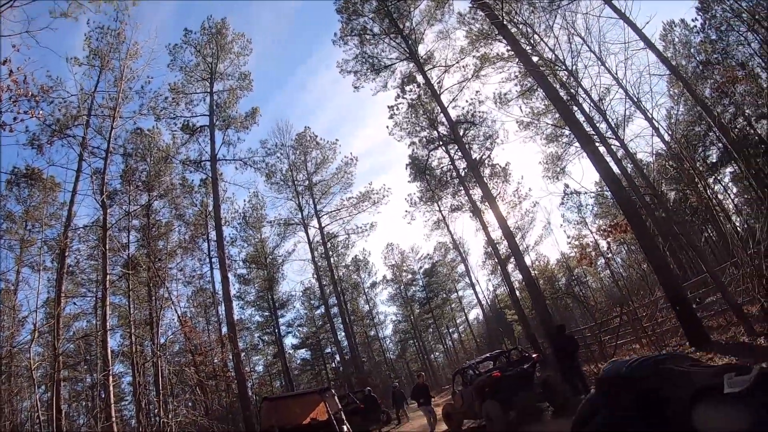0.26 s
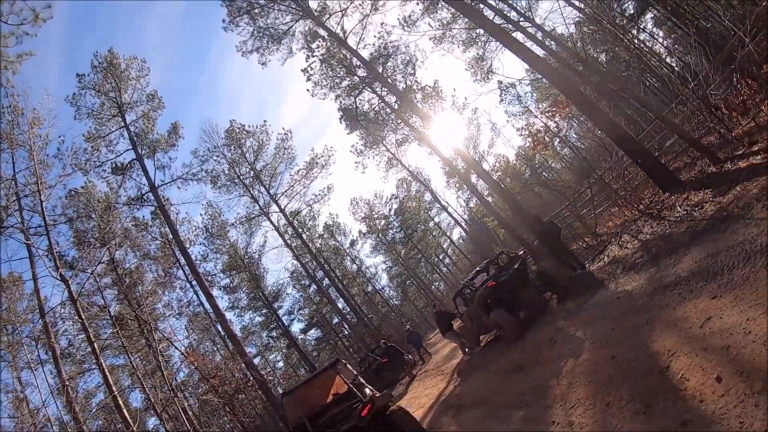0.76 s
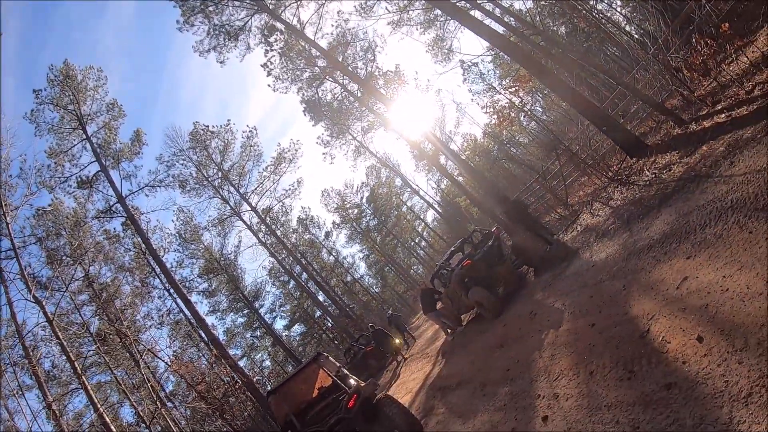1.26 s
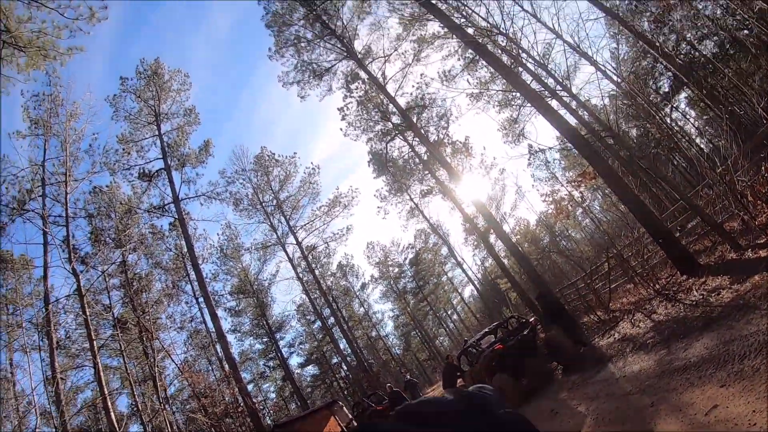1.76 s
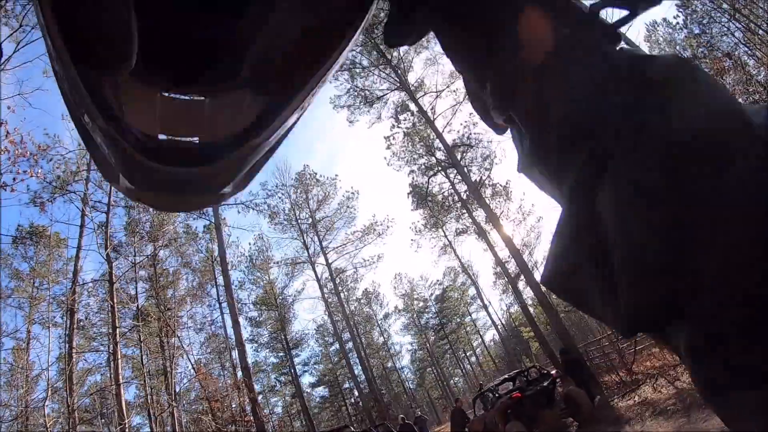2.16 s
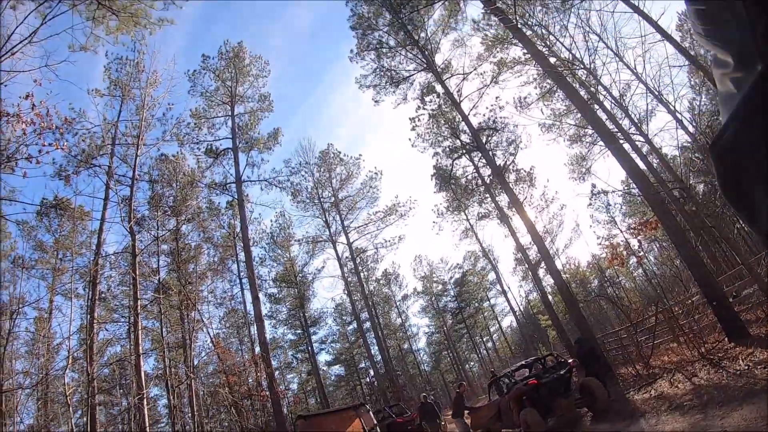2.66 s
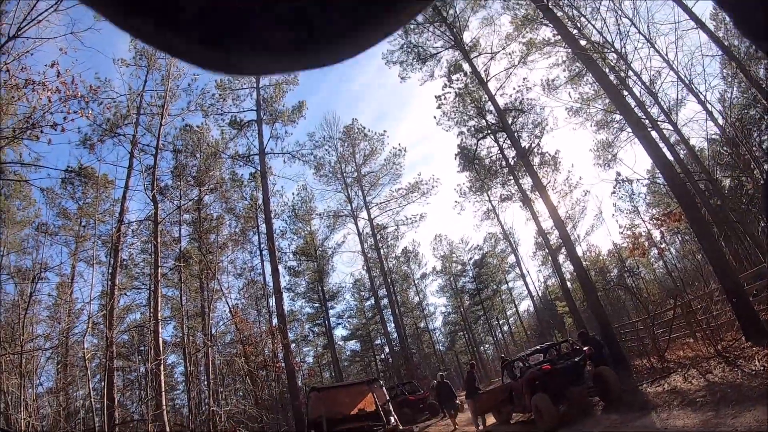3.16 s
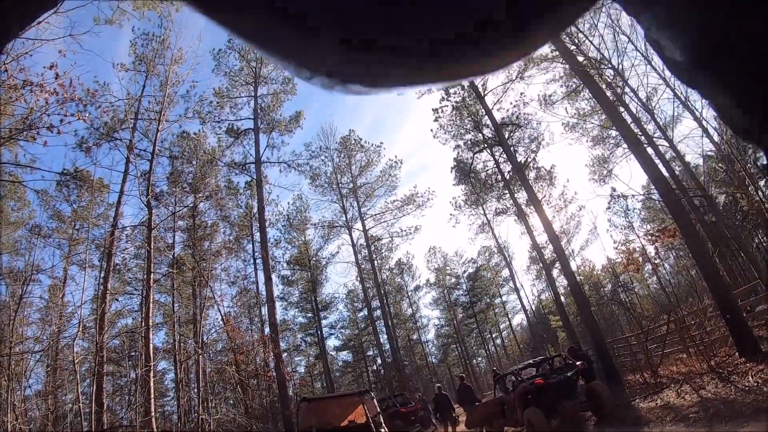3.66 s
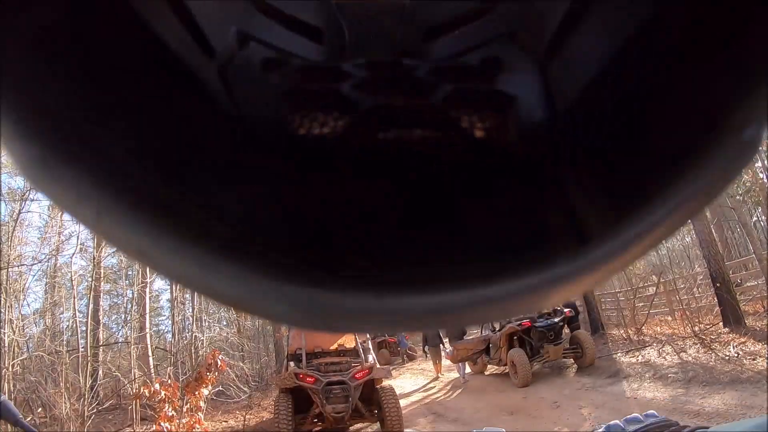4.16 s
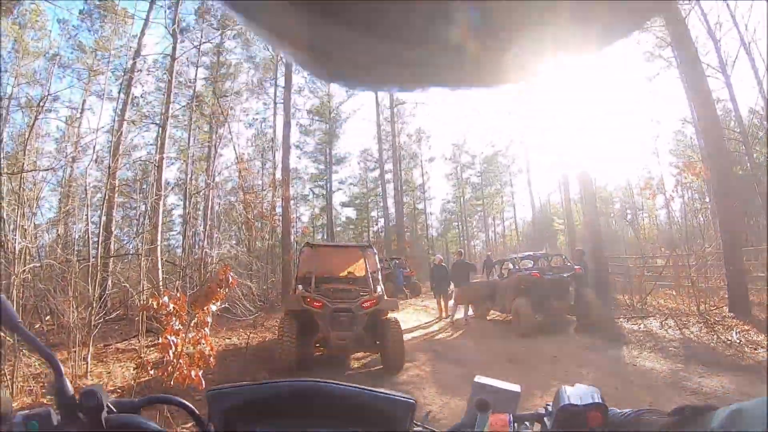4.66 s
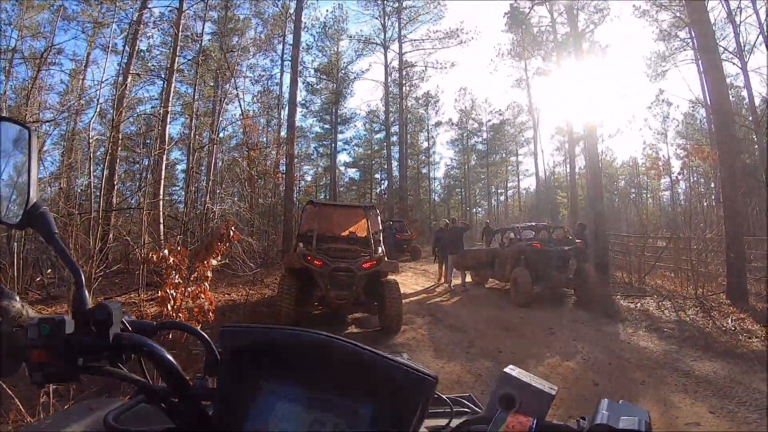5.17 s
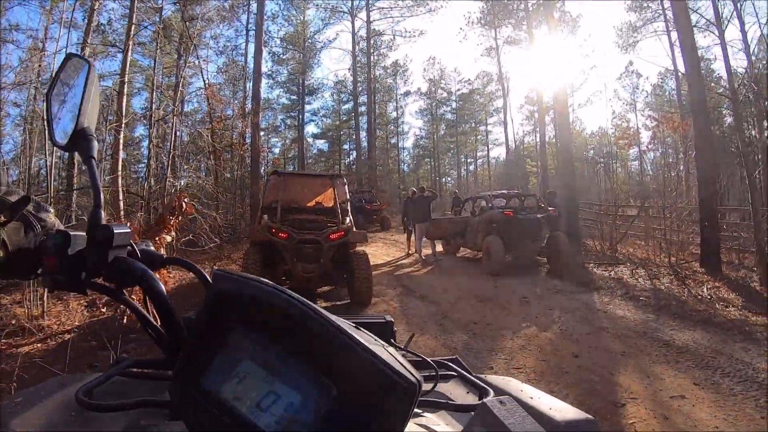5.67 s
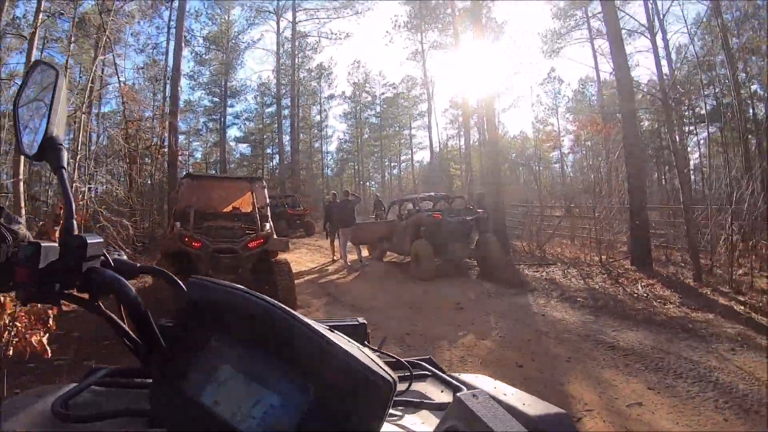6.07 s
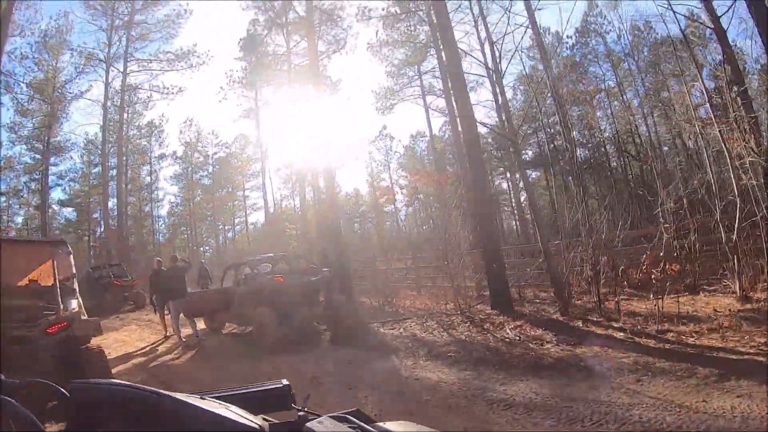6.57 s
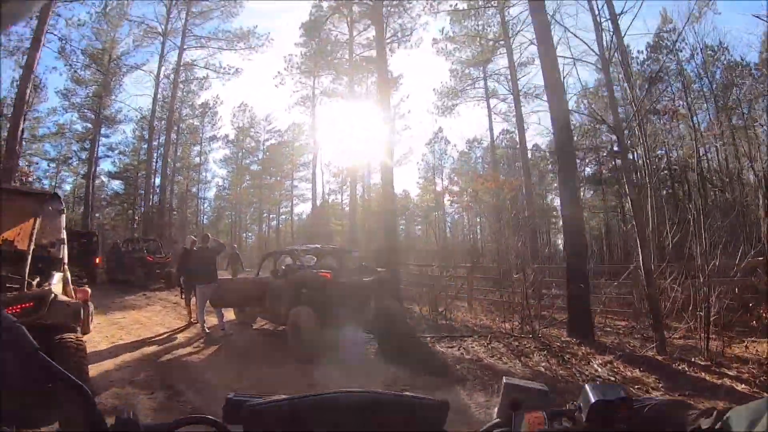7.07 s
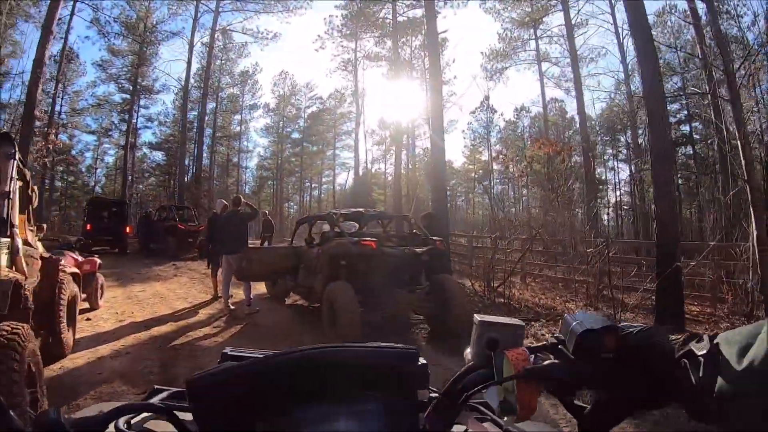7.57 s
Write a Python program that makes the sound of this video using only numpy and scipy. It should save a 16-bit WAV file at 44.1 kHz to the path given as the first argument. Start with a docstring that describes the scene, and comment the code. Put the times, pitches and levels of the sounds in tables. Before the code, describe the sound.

Clothing rubs and bumps the microphone over a thudding all-terrain vehicle idle, until a sharp knock, after which the engine revs and drives off.

```python
"""A single-cylinder quad thuds at idle under a rustling jacket, heard from a stereo camera worn by the
rider on a forest trail; other engines rumble nearby. Cloth, straps and zips rub and tap the camera's
case, until a hard knock overloads it and its gain control ducks, then recovers. The quad revs, pulls
away, eases off and picks up again, each firing thumping the silencer and cracking the tailpipe.
The tyres rumble, the bodywork clunks and a nylon sleeve sweeps past."""
import sys
import numpy as np
from scipy import signal
from scipy.fft import rfft, irfft
from scipy.io import wavfile
from scipy.ndimage import uniform_filter1d, minimum_filter1d, map_coordinates

SR = 44100
rng = np.random.default_rng(int(sys.argv[2]) if len(sys.argv) > 2 else 0)


def waveform_to_disk(signal):
    """Save audio, clipped to [-1, 1], as 16-bit WAV at the path in sys.argv[1]."""
    frames = np.transpose(np.atleast_2d(signal))
    scaled = np.clip(frames, -1, 1) * 32767
    samples = np.round(scaled).astype(np.int16)
    wavfile.write(sys.argv[1], SR, samples)


N = 344406
TIME = np.arange(N) / SR
HZ = np.fft.rfftfreq(N, 1 / SR)


def gain_of(db):
    """Decibels to amplitude."""
    return 10 ** (np.asarray(db) / 20)


def unit_rms(x):
    """Scales to rms 1."""
    return x / np.sqrt(np.mean(x ** 2) + 1e-20)


def curve(rows):
    """Joins rows of (time_s, value) by straight lines."""
    return np.interp(TIME, *np.transpose(rows))


def stroke(start, rise, hold, fall, db):
    """Gain that swells, holds and dies away; times in seconds."""
    return gain_of(db) * np.interp(TIME, start + np.cumsum([0, rise, hold, fall]), [0, 1, 1, 0])


def colour(x, spectrum):
    """Filters by an outline of (freq_hz, level_db); rms 1."""
    hz, db = np.transpose(spectrum)
    outline_db = np.interp(np.log(HZ + 1), np.log(hz), db)
    return unit_rms(irfft(rfft(x) * gain_of(outline_db), N))


def ring(x, modes, order=1):
    """Passes x through parallel resonances, with steeper skirts at a higher order; rms 1."""
    body = sum(gain_of(db) * (1j * HZ * width / (hz ** 2 - HZ ** 2 + 1j * HZ * width)) ** order
               for hz, width, db in modes)
    return unit_rms(irfft(rfft(x) * body, N))


def cut(x, hz, kind, order=2):
    """Butterworth low- or high-pass."""
    return signal.sosfilt(signal.butter(order, hz, kind, fs=SR, output="sos"), x)


def wander(hz):
    """Random drift of rms 1, up to the given rate."""
    return unit_rms(irfft(rfft(rng.standard_normal(N)) / (1 + (HZ / hz) ** 4), N))


def waver(x, share, hz):
    """Lets all the resonances in x drift up and down together by a small share."""
    drift = cut(share * wander(hz), 1, "high", order=1)
    return map_coordinates(x, [np.cumsum(1 + drift)], order=3, mode="reflect")


def panned(x, db):
    """Places a sound by its left-minus-right level."""
    return x * gain_of([[db / 2], [-db / 2]])


def add(mix, start_s, sound):
    """Mixes a sound in at start_s."""
    part = mix[..., round(start_s * SR):][..., :sound.shape[-1]]
    part += sound[..., :part.shape[-1]]


def firings(cycles, uneven_db, jitter_s):
    """One click per engine cycle, each a little different in strength and timing."""
    at = np.flatnonzero(np.diff(np.floor(cycles)))
    size, delay = rng.standard_normal((len(at), 2)).T
    shift = (delay * np.broadcast_to(jitter_s, N)[at] * SR).astype(int)
    clicks = np.zeros(N)
    clicks[np.clip(at + shift, 0, N - 1)] = gain_of(size * np.broadcast_to(uneven_db, N)[at])
    return clicks


def weave(snaps_per_s, spread_db, hiss):
    """Threads catch and let go: sparse snaps of uneven size over a smooth hiss."""
    size = gain_of(spread_db * np.minimum(rng.exponential(1, N), 4))
    snaps = size * rng.choice([-1, 1], N) * (rng.random(N) < snaps_per_s / SR)
    return unit_rms(snaps) + hiss * rng.standard_normal(N)


def thock(db, hz, t60, grit):
    """One damped mode with gritty contact noise."""
    t = TIME[:SR // 5]
    noise = unit_rms(cut(rng.standard_normal(len(t)), 0.53 * hz, "low"))
    return gain_of(db - 60 * t / t60) * ((1 - grit) * np.sin(2 * np.pi * hz * t) + grit * noise / 2)


def blow(db, modes):
    """Rings all the modes of a part, building up over a quarter cycle of the lowest."""
    sound = sum(thock(db + mode_db, hz, t60, grit) for hz, mode_db, t60, grit in modes)
    contact_s = .25 / modes[0][0]
    return sound * (1 - np.exp(-(TIME[:len(sound)] / contact_s) ** 2))


def blows(events, modes):
    """Strikes one part, right of centre, at each (start_s, level_db)."""
    out = np.zeros(N)
    for start_s, db in events:
        add(out, start_s, blow(db, modes))
    return panned(out, -6)


# The engine, just below the camera: time_s, firings_per_s
ENGINE_SPEED = [(0, 11.837), (5.0, 11.837), (5.15, 13.188), (5.3, 19.789), (5.45, 22.625), (5.6, 24.859),
                (5.85, 25.414), (6.3, 25.007), (6.7, 23.241), (7.0, 18.857), (7.18, 15.842), (7.38, 18.647),
                (7.82, 19.239)]
# The rider's thumb on the throttle: time_s, open_share
THROTTLE = [(5.08, 0), (5.2, 0.72), (5.3, 0.85), (5.6, 0.87), (6.3, 1), (6.68, 0.97), (6.95, 0.41),
            (7.25, 0.37), (7.55, 0.76)]
# Ground speed along the trail: time_s, speed_share
GROUND_SPEED = [(5.5, 0), (6.25, 0.17), (6.45, 0.85), (7.0, 0.75), (7.2, 0.35), (7.8, 0.55)]

def quad():
    """One cylinder's firings, gas flow and rattle drive the exhaust, casing, intake and belt."""
    rate, throttle, roll = curve(ENGINE_SPEED), curve(THROTTLE), curve(GROUND_SPEED)
    idling = np.clip(rate[0] + 1 - rate, 0, 1)
    load = np.clip((rate - 13) / 4, 0, 1)
    bite = np.clip((rate - 17.5) / (24 - 17.5), 0, 1)  # the exhaust sharpens at high revs
    cycles = np.cumsum(rate) / SR + .05 * idling * wander(1.5)  # the idle hunts a little
    phase = cycles % 1
    uneven_db = 2.6 * (1 - load) + .6 * load  # combustion steadies when the engine pulls
    jitter_s = .0018 * (1 - load) + .0001 * load
    clicks = firings(cycles, uneven_db, jitter_s) / np.sqrt(rate)
    gas = rng.standard_normal(N) * (0.48 + np.exp(-phase / 0.59))  # turbulent outflow after each firing
    slap = 2.6 * np.exp(-((phase - .6) / .1) ** 2)  # the piston hits the casing once a cycle
    valves = .8 * np.exp(-phase / .2)
    rattle = rng.standard_normal(N) * (1 + slap + valves) * gain_of(wander(58))
    boom = gain_of(2.5 * roll) * silencer(clicks, gas, cycles, rate, load, bite)
    whirr = gain_of(4.5 * roll) * casing(rattle, slap, rate, throttle)
    bark = (1 - idling) * tailpipe(clicks, gas, throttle, load, bite)
    return boom + whirr + bark + intake(gas, phase) + belt(rattle)


# The silencer's resonances, heard from the seat: pitch_hz, width_hz, level_db
SILENCER_MODES = [(50.3, 9, -2.5), (95.4, 8.4, 6.5), (110.9, 8.8, 2), (125.2, 3.5, 5), (190.8, 22, -12.5)]
# Its boom, strongest at middle revs: firings_per_s, level_db
BOOM_BY_SPEED = [(12, -33.5), (16, -29), (19, -28.5), (21.5, -29), (25, -31)]
# Its drone under load: engine_order, low_revs_gain, high_revs_gain
DRONE_ORDERS = [(5, .6, .8), (6, .65, 0)]

def silencer(clicks, gas, cycles, rate, load, bite):
    """Firings thump the silencer, gas flutters through it, and under load it drones."""
    lope = 1 + .45 * load * (1 - bite) * np.cos(np.pi * cycles)  # every other firing is weaker
    thud = unit_rms(cut(ring(clicks * lope, SILENCER_MODES), 200, "low", order=4))
    flutter = unit_rms(cut(ring(gas, SILENCER_MODES), 280, "low", order=3)) * (.35 - .22 * load)
    drone = sum((low + (high - low) * bite) * np.sin(2 * np.pi * order * cycles)
                for order, low, high in DRONE_ORDERS)
    boom_db = np.interp(rate, *np.transpose(BOOM_BY_SPEED))
    return gain_of(boom_db) * unit_rms(thud + flutter + load * lope * drone)


# The engine casing under the rider, and its brightest panels: pitch_hz, width_hz, level_db
CASING_MODES = [(1240, 425, -2), (1636, 120, 5), (2700, 240, -6.5), (3460, 450, -10.5), (3940, 180, -9.5),
                (4480, 450, -9), (5690, 450, -25), (6600, 290, -25), (7800, 800, -28), (10800, 1100, -46)]
PANEL_MODES = [(1670, 120, 0), (2235, 65, -6), (5780, 160, -25)]

def casing(rattle, slap, rate, throttle):
    """The casing whirrs, louder with revs and throttle; piston slap ticks in its panels."""
    ticking = gain_of(0.5) * ring(rng.standard_normal(N) * (.9 + slap), PANEL_MODES, order=2)
    whirr_db = -58.5 + 7 * np.log2(rate / rate[0]) + 7.5 * throttle
    return gain_of(whirr_db) * unit_rms(ring(rattle, CASING_MODES, order=2) + ticking)


# Other engines, nearby in the forest: firings_per_s, level_db, left_minus_right_db
OTHER_ENGINES = [(21.42, -39, -18), (31.52, -39.5, 2.5)]
# Their colour through the trees: freq_hz, level_db
FOREST_SPECTRUM = [(15, -22.5), (45, -0.5), (95, 9.5), (160, -7), (280, -12), (450, -22.5), (1200, -31.5),
                   (3000, -28.5), (8000, -74.5), (15000, -84.5)]

def other_engines():
    """Other engines tick over; the trees smear their pulses."""
    out = np.zeros((2, N))
    tail = np.exp(-TIME[:SR // 4] / 0.036)
    for rate, db, pan_db in OTHER_ENGINES:
        cycles = np.cumsum(rate * (1 + .015 * wander(2))) / SR
        clicks = firings(cycles, uneven_db=3.0, jitter_s=0.00092)
        scatter = rng.standard_normal(N) * np.sqrt(abs(signal.fftconvolve(clicks, tail)[:N]))
        pulses = unit_rms(clicks) + 1.3 * unit_rms(scatter)
        out += panned(gain_of(db) * colour(pulses, FOREST_SPECTRUM), pan_db)
    return out


# Rubbing that both microphones share, and that shakes them in opposition: freq_hz, level_db
RUB_COMMON = [(30, 6), (120, 14.5), (230, 9), (340, 0.5), (480, -5.5), (700, -6), (1150, 0), (1500, -3),
              (1900, -6), (3300, -24), (4200, -33), (7500, -46.5), (9500, -42), (15000, -84.5)]
RUB_OPPOSED = [(180, -58.5), (300, -17.5), (482, -12), (606, -6), (928, 0.5), (1250, -12), (1470, -12.5),
               (1880, -13), (2280, -20), (2920, -19.5), (3920, -36), (5530, -37.5), (7300, -50),
               (10300, -55), (15000, -82.5)]
# The camera's case, around the microphones: pitch_hz, width_hz, level_db
CAMERA_MODES = [(584, 77, -6.5), (1180, 370, 1), (1850, 150, 0.5), (2215, 140, -6.5), (2730, 177, -10.5),
                (3210, 77, -10.5), (3587, 164, -18)]
# The jacket, right on the camera:
# start_s, rise_s, hold_s, fall_s, level_db, extra_bass_db, extra_treble_db
JACKET_RUBS = [(0.066, 0.15, 0.5, 0.15, -32.5, 0.5, 4), (0.904, 0.027, 0.22, 0.028, -31.5, -3.5, 1.5),
               (1.155, 0.025, 0.082, 0.012, -36.5, 1, 0.5), (1.473, 0.33, .02, 0.19, -29, 1.5, 0),
               (1.726, 0.02, 0.41, 0.051, -40, 0.5, 14), (2.12, 0.03, 0.18, 0.43, -31.5, 1.5, 6.5),
               (2.345, 0.027, 0.05, 0.15, -37, 0, 16), (2.53, 0.099, 0.07, 0.031, -34.5, 0, 12),
               (2.81, 0.14, 0.11, 0.069, -40.5, -1, 9), (3.043, 0.19, 0.05, 0.074, -29.5, -1, 8),
               (3.298, 0.14, 0.048, 0.04, -34, 2.5, 10), (3.498, 0.063, 0.23, 0.14, -38, 4.5, 12),
               (3.851, 0.052, 0.016, 0.026, -21.5, -2.5, 11.5), (4.103, 0.065, 0.027, 0.06, -34.5, 0, -8),
               (4.224, 0.04, 0.31, 0.36, -38.5, 3, 7.5), (4.768, 0.058, 0.075, 0.12, -37, -18, 6.5),
               (5.185, 0.011, 0.34, 0.44, -42.5, -6, 13), (6.202, 0.29, .07, 0.26, -30, 0.5, 3),
               (6.73, 0.28, 0.053, 0.17, -30, 6.5, -2), (7.167, 0.028, 0.091, 0.22, -38.5, 6, 13)]

def jacket():
    """Cloth drags on the camera's case, which rings and shakes the two microphones."""
    slips = np.cumsum(75 * gain_of(3.0 * wander(40))) / SR
    catch = (1.34 + np.exp(-(slips % 1) / 0.32)) * gain_of(0.98 * wander(31))  # grips, then lets go
    common = gain_of(-0.13) * colour(catch * weave(1800, 1.9, 0.98), RUB_COMMON)
    case = ring(catch * weave(500, 2.4, 0.49), CAMERA_MODES, order=2)
    common += gain_of(-6) * waver(case, share=.022, hz=6)  # the cloth's pressure shifts the resonances
    opposed = gain_of(7.5) * colour(catch * weave(1700, 0.78, 1.0), RUB_OPPOSED)
    cloth = panned(np.array([common + opposed, common - opposed]), -1.8)
    bass = cut(cloth, 425, "low", order=3)
    body = cut(cut(cloth, 400, "high", order=3), 4100, "low", order=4)
    fizz = cut(cloth, 5150, "high", order=4)
    bass_power, body_power, fizz_power = gain_of([-43.5, -47.5, -37.5]) ** 2  # faint stir between rubs
    for *shape, bass_db, treble_db in JACKET_RUBS:
        drag = stroke(*shape)
        bass_power += (gain_of(bass_db) * drag) ** 2
        body_power += drag ** 2
        fizz_power += (gain_of(treble_db) * drag) ** 2
    return np.sqrt(bass_power) * bass + np.sqrt(body_power) * body + np.sqrt(fizz_power) * fizz


# A strap creaking at the camera: start_s, end_s, slips_per_s, first_db, last_db
STRAP_SLIPS = [(.3, .42, 58, -26, -24), (.632, .66, 75, -24, -24), (1.094, 1.135, 68, -25, -25),
               (1.72, 1.8, 62, -24, -23), (2.128, 2.34, 66, -16, -29), (3.266, 3.315, 70, -18.5, -17),
               (3.86, 3.9, 145, -22, -23)]
# The case after each slip: pitch_hz, level_db, t60_s, grit_share
SLIP_MODES = [(1100, 1, .016, .25), (1950, -1, .016, .35)]

def strap():
    """A strap sticks and slips in quick runs; each slip rings the case."""
    out = np.zeros(N)
    for start, end, rate, first_db, last_db in STRAP_SLIPS:
        for slip_s in np.arange(start, end, 1 / rate):
            db = np.interp(slip_s, [start, end], [first_db, last_db]) + rng.standard_normal()
            jitter_s = .01 * (slip_s - start) * rng.standard_normal()
            add(out, slip_s + jitter_s, blow(db, SLIP_MODES))
    return panned(out, -2.5)


# Taps right beside the microphones: start_s, level_db
ZIP_TAPS = [(0.607, -13), (1.064, -25), (2.616, -25), (3.049, -19), (3.165, -14), (3.195, -14),
            (3.427, -22), (3.668, -19), (3.898, -14)]
# The tapped case: pitch_hz, level_db, t60_s, grit_share
TAP_MODES = [(1140, 0.0021, 0.0089, 0.47)]

def zips():
    """Zips and straps tap the case, which rings very briefly."""
    return blows(ZIP_TAPS, TAP_MODES)


# The rider against the camera: start_s, level_db
BODY_BUMPS = [(.672, -19), (1.774, -21), (2.305, -20), (3.166, -15), (3.671, -8.5)]
# The thump: pitch_hz, level_db, t60_s, grit_share
BUMP_MODES = [(100, 0, .07, .05), (190, -3, .04, .12), (330, -10, .018, .3)]

def body_bumps():
    """The rider's body bumps the camera with a soft, low thump."""
    return blows(BODY_BUMPS, BUMP_MODES)


# Webbing on the camera mount: start_s, rise_s, hold_s, fall_s, level_db, pitch_hz
HARNESS_DRAGS = [(3.42, 0.033, 0.049, 0.017, -39, 1078), (6.78, 0.17, .13, 0.043, -45, 1075),
                 (7.121, 0.017, 0.0099, 0.0085, -35, 955), (7.15, 0.097, 0.086, 0.033, -41, 1049)]

def harness():
    """Dragging webbing excites one narrow, hollow resonance that wavers with the pressure."""
    grain = cut(weave(600, 1.4, 0.65) + 1j * weave(540, 2.1, 0.26), 110, "low")
    bent_time = np.cumsum(1 + 0.055 * wander(14.05)) / SR
    return sum(stroke(*shape) * unit_rms((grain * np.exp(2j * np.pi * hz * bent_time)).real)
               for *shape, hz in HARNESS_DRAGS)


# A buckle close to the camera: pitch_hz, level_db, t60_s
BUCKLE_MODES = [(1793, -39.5, 1), (3467, -53, .8), (3553, -47, .7), (6799, -62, .85), (7752, -63, .9)]

def hard_knock(start_s=3.9078, db=24.8):
    """A hard strike cracks and thumps the camera's case and sets a buckle ringing."""
    strike = np.array([thock(db, hz, t60=.0038, grit=.35) for hz in (2050, 1500)])  # left, right
    crack = np.array([thock(db - 14, 4570, t60=.005, grit=.85) for _ in range(2)])
    thump = thock(-9, 79, t60=.14, grit=.05)
    t = TIME[:SR]
    buckle = sum(gain_of(mode_db - 60 * t / t60) * np.sin(2 * np.pi * hz * t)
                 for hz, mode_db, t60 in BUCKLE_MODES)
    out = np.zeros((2, N))
    add(out, start_s, strike + crack + thump)
    add(out, start_s, panned(buckle, 4))
    return out


# Shaking, as the microphones pick it up: freq_hz, level_db
SHAKE_SPECTRUM = [(12, -28), (35, 5.5), (70, 7.5), (130, 0), (210, -1.5), (330, -17), (600, -29),
                  (2000, -74.5)]

def camera_shake():
    """The camera wobbles on its harness after the knock, then shakes with the rolling tyres."""
    wobble = stroke(start=4.03, rise=.07, hold=.06, fall=.08, db=-20.5)
    tyres = gain_of(-23) * curve(GROUND_SPEED)
    lumps = rng.standard_normal(N) * gain_of(2.0 * wander(25))
    return (wobble + tyres) * colour(lumps, SHAKE_SPECTRUM)


# The mount that holds the camera: pitch_hz, level_db, t60_s, grit_share
MOUNT_MODES = [(120, -3, .06, .05), (240, -1, .035, .1), (370, 0, .03, .1), (520, -5, .025, .1)]

def mount():
    """The mount drops back into its seat with a hollow knock."""
    return blows([(4.038, -7)], MOUNT_MODES)


# Faint squeaks, dead centre: start_s, length_s, start_hz, end_hz, level_db
SQUEAKS = [(4.705, .045, 5600, 6400, -58), (4.88, .08, 6250, 5550, -63)]

def squeaks():
    """Two thin, pure glides: one rises, the next falls."""
    out = np.zeros(N)
    for start_s, length_s, start_hz, end_hz, db in SQUEAKS:
        hz = np.linspace(start_hz, end_hz, round(length_s * SR))
        add(out, start_s, gain_of(db) * np.hanning(len(hz)) * np.sin(2 * np.pi * np.cumsum(hz) / SR))
    return out


# The lever, at arm's length: start_s, level_db
LEVER_CLICKS = [(4.993, -20)]
# Its ring: pitch_hz, level_db, t60_s, grit_share
LEVER_MODES = [(1480, -10.5, 0.051, 0.21), (1660, -16, .04, 0.35), (3030, -13, .03, 0.74),
               (4440, -3.5, 0.032, 0.85)]

def lever():
    """The lever clicks and rings just before the engine revs."""
    return blows(LEVER_CLICKS, LEVER_MODES)


# The air box, heard from the seat: pitch_hz, width_hz, level_db
AIR_BOX_MODES = [(291, 88, 0), (414, 160, -3.5), (1270, 420, -14)]

def intake(gas, phase):
    """The engine gulps air through the air box as the throttle snaps open."""
    gulps = ring(gas * np.exp(-phase / 0.89), AIR_BOX_MODES, order=2)
    return stroke(start=5, rise=.1, hold=.65, fall=1.7, db=-44.5) * gulps


# The tailpipe, behind the rider: pitch_hz, width_hz, level_db
PIPE_MODES = [(230, 20, -1), (252, 18, 3), (277, 16, 1.5), (301, 9.4, 3), (394.4, 26, 3), (470, 39, -4.5)]

def tailpipe(clicks, gas, throttle, load, bite, puff_s=.00062, muffled_hz=300):
    """Each firing pushes and pulls a puff of air that rings the pipe, muffled at low revs."""
    puff_time = TIME[:SR // 50] / puff_s - 4
    puffs = unit_rms(signal.oaconvolve(clicks, puff_time * np.exp(-puff_time ** 2 / 2))[:N])
    note = unit_rms(puffs + gain_of(1) * ring(puffs, PIPE_MODES))
    gas_share = .5 * (1 - load) + .07 * load
    outflow = (1 - gas_share) * note + gas_share * ring(gas, PIPE_MODES, order=2)
    sharp = unit_rms(cut(outflow, 170, "high"))
    muffled = unit_rms(irfft(rfft(sharp) / (1 + (HZ / muffled_hz) ** 8), N))
    return gain_of(-56 + 22.5 * throttle) * (bite * sharp + (1 - bite) * muffled)


def belt(rattle, pitch_hz=2915, width_hz=130):
    """The drive belt sings one wavering note while it pulls hard."""
    note = waver(ring(rattle, [(pitch_hz, width_hz, 0)], order=2), share=.0078, hz=4.8)
    return stroke(start=5.2, rise=.4, hold=.65, fall=.35, db=-46.5) * note


# A small metal part, close by: start_s, level_db
METAL_PINGS = [(6.686, -21)]
# Its ring: pitch_hz, level_db, t60_s, grit_share
METAL_MODES = [(1160, -2, .03, .4), (2966, -1, .02, .7), (3700, -11, .03, .5), (4560, -7, .025, .5),
               (5400, -8, .028, .4), (11000, -11, .015, 1)]

def metal_ping():
    """A metal part clicks with a short, bright ring."""
    return blows(METAL_PINGS, METAL_MODES)


# The quad's bodywork, below the camera: start_s, level_db
BODYWORK_CLUNKS = [(7.142, -24), (7.152, -9.5)]
# Its ring: pitch_hz, level_db, t60_s, grit_share
BODYWORK_MODES = [(315, 2.5, 0.014, 0), (441, -3, 0.013, 0.27), (704, -7, 0.031, 0.091),
                  (1165, 3.5, 0.015, 0.12), (1410, -7, 0.03, 0.68), (6500, -26.5, 0.041, 1)]

def bodywork():
    """The plastic bodywork clunks twice in quick succession, lightly and then hard."""
    return blows(BODYWORK_CLUNKS, BODYWORK_MODES)


# A sleeve passing the microphones: start_s, rise_s, hold_s, fall_s, level_db
SLEEVE_SWEEPS = [(7.267, 0.086, 0.087, 0.14, -28.5), (7.535, 0.12, 0.037, 0.16, -33)]
# The nylon's hiss: freq_hz, level_db
NYLON_SPECTRUM = [(500, -17.5), (1000, -4.5), (1400, 1), (2400, -3), (3400, -13), (4000, -18),
                  (4900, -19.5), (6200, -32), (9000, -35), (13000, -39.5), (15000, -63)]
# The plastic under it: pitch_hz, width_hz, level_db
PLASTIC_MODES = [(1390, 90, -2), (1520, 90, -2), (1900, 130, -4), (2235, 90, 0), (2480, 140, 0),
                 (2780, 200, -6), (3260, 110, -5), (3520, 120, -10), (4760, 260, -18)]

def sleeve():
    """Nylon slides over hard plastic in two strokes: a hiss, and a rasp in the plastic's resonances."""
    hiss = colour(weave(2500, 1.2, 0.59) * gain_of(2.8 * wander(65)), NYLON_SPECTRUM)
    rasp = gain_of(2.5) * ring(weave(1500, 6.8, 0.45), PLASTIC_MODES, order=2)
    return sum(stroke(*sweep) for sweep in SLEEVE_SWEEPS) * unit_rms(hiss + rasp)


def scene():
    """Engines, clothing, clatter and shaking as they reach the camera."""
    engines = panned(quad(), -1.4) + other_engines()
    clothing = jacket() + strap() + zips() + harness() + sleeve()
    clatter = body_bumps() + hard_knock() + mount() + lever() + metal_ping() + bodywork()
    return engines + clothing + clatter + camera_shake() + squeaks()


# The camera's stereo image, closing as the quad moves off: time_s, width_share
STEREO_WIDTH = [(0, 0.45), (5.0, 0.25), (5.3, 0.01), (7.8, 0)]

def record(dry, threshold_db=-5, max_duck_db=25.5, recovery_db_per_s=14.7, ceiling=.85, top_hz=15500):
    """The camera ducks after an overload and creeps back, narrows the image, limits and trims the top."""
    over_db = 20 * np.log10(abs(dry).max(0) + 1e-9) - threshold_db
    needed_db = np.minimum(over_db, max_duck_db)
    recovery_db = recovery_db_per_s * TIME
    duck_db = np.maximum(np.maximum.accumulate(needed_db + recovery_db) - recovery_db, 0)
    left, right = dry / gain_of(cut(duck_db, 9.9, "low", order=1))
    mid = (left + right) / 2
    side = (left - right) / 2 * curve(STEREO_WIDTH)
    pair = np.array([mid + side, mid - side])
    limiter_gain = np.minimum(ceiling / (abs(pair).max(0) + 1e-9), 1)
    limited = pair * uniform_filter1d(minimum_filter1d(limiter_gain, size=31), size=31)
    low_pass = signal.firwin(511, top_hz, window=("kaiser", 9), fs=SR)
    return signal.oaconvolve(limited, low_pass[None], "same")


dry = scene()
out = record(dry)
waveform_to_disk(out)
```